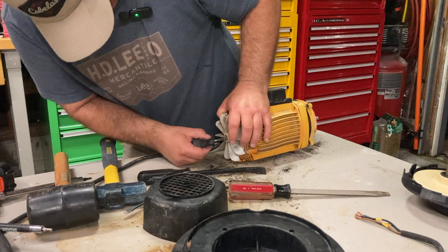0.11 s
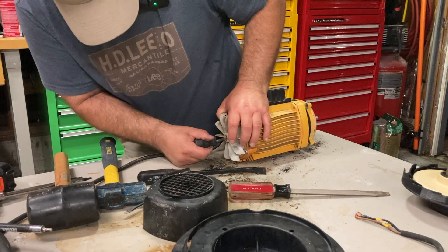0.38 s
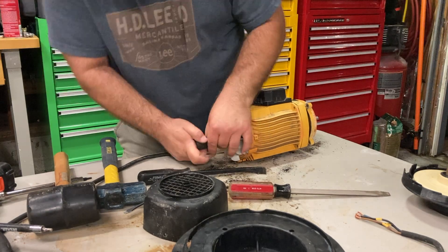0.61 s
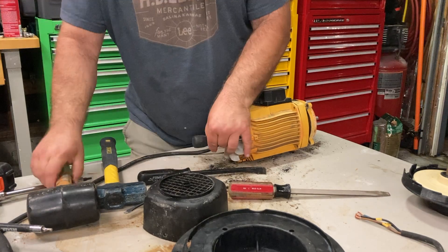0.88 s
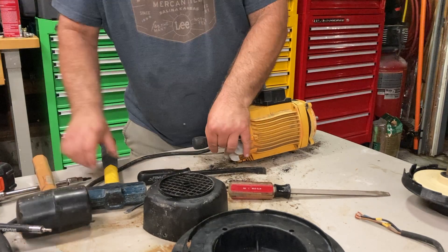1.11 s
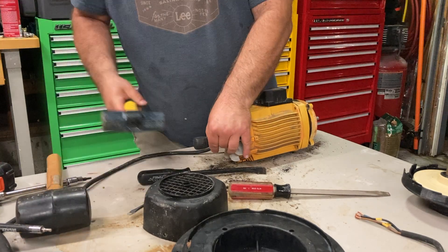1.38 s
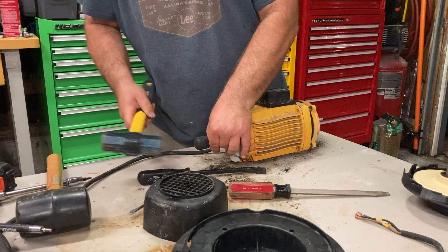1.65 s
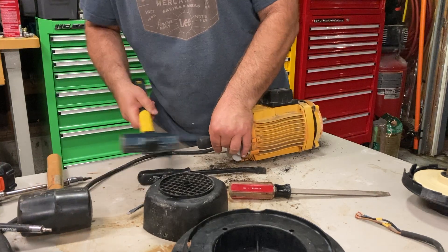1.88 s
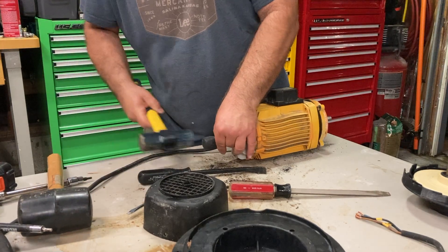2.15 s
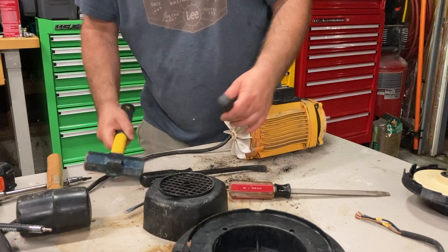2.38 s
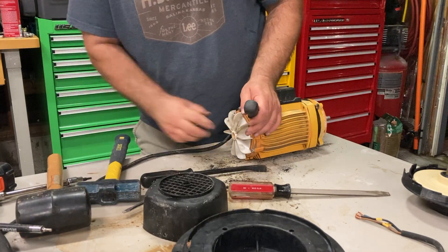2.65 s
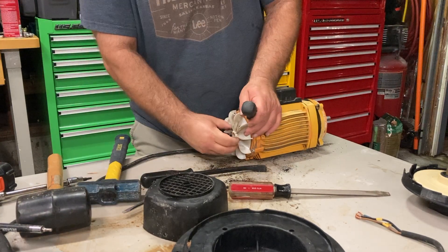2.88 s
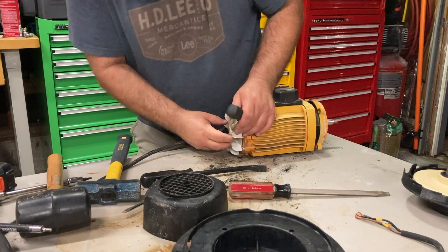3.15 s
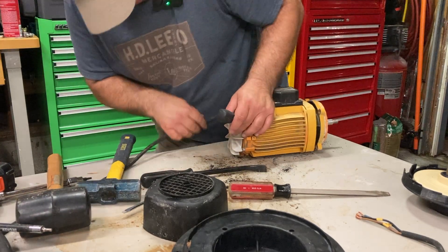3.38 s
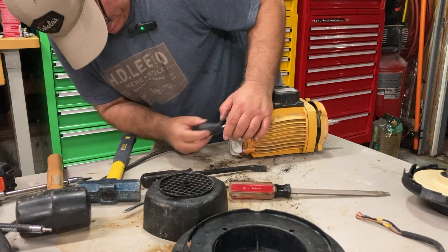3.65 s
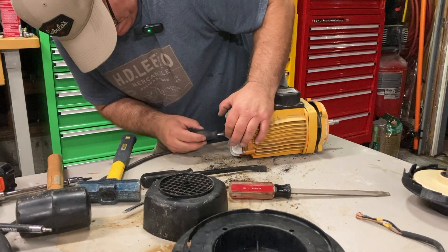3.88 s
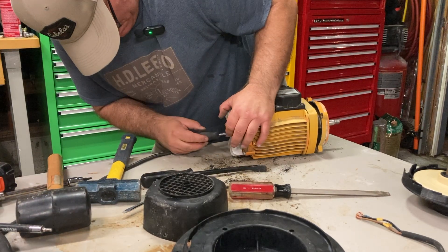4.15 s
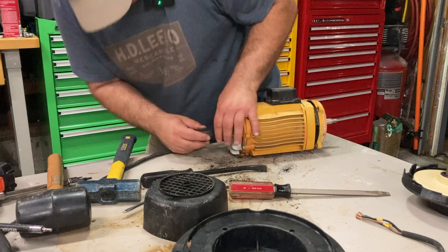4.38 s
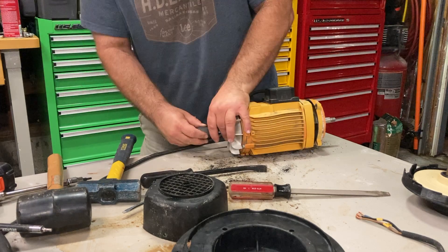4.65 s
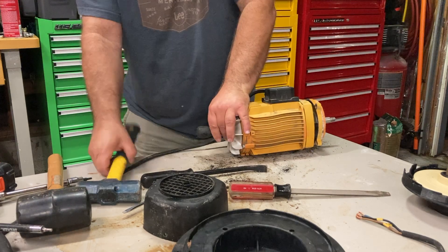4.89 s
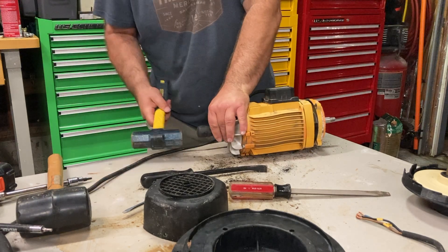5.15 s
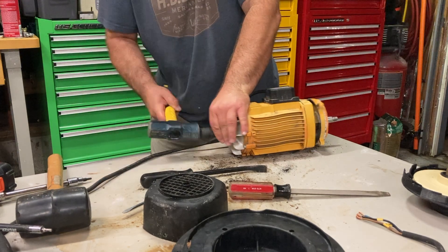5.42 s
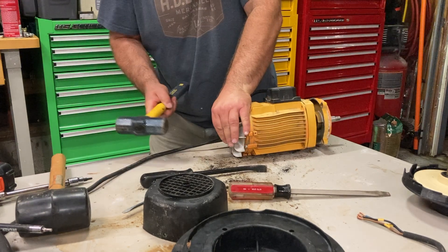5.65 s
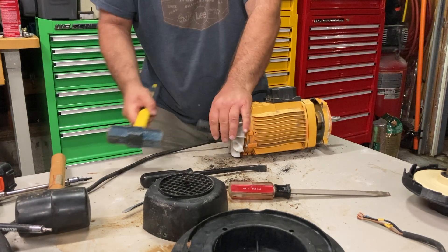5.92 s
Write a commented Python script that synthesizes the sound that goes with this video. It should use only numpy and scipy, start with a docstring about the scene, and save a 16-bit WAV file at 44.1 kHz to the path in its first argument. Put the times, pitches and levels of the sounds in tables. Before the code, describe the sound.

Five brisk hammer blows, tools knocked down and dragged on a workbench, fabric rumble against a lapel microphone, then three more hard, clacking blows.

```python
"""In a garage, a hammer taps a screwdriver against a plastic fan on a motor shaft, in two quick clusters.
The blows are fixed resonances and dying coloured noise. Around them tools land on the bench and drag
along it, the blade ticks on the part, and rubs and low rumbles swell as bands of grainy noise. The shirt
rumbles over and bumps a lapel microphone, which overloads on the loudest blows; late on, a thin tone holds."""
import sys
import numpy as np
from scipy import signal
from scipy.fft import rfft, irfft, next_fast_len
from scipy.io import wavfile
from scipy.ndimage import map_coordinates

SR = 44100
rng = np.random.default_rng(int(sys.argv[2]) if len(sys.argv) > 2 else 0)


def dump_mix(stems):
    """Bounce the given channels to the path in sys.argv[1] as a 16-bit WAV at rate SR."""
    frames = np.atleast_2d(stems).T  # one column per channel
    limited = np.clip(frames, -1, 1)  # hard clip at full scale
    pcm = np.round(limited * 32767).astype(np.int16)
    wavfile.write(sys.argv[1], SR, pcm)


def volts_from_decibels(level):
    """Turn decibel levels (scalar or array-like) into linear amplitude factors."""
    exponent = np.asarray(level, float) / 20
    return 10 ** exponent


N = 265967


def unit(x):
    """Normalisation: scale to rms 1."""
    return x / np.sqrt(np.mean(x ** 2) + 1e-20)


def along(points, hz):
    """Interpolation on a logarithmic frequency axis, of points (frequency_hz, value)."""
    f, v = np.transpose(points)
    return np.interp(np.log(hz + 1), np.log(f + 1), v)


def shelf(hz, corner_hz, db):
    """Shelving response: gain moves smoothly by db from below the corner to above it."""
    return volts_from_decibels(db * hz ** 2 / (hz ** 2 + corner_hz ** 2))


def filtered(x, response):
    """Linear filtering: the spectrum of x times a response given as a function of frequency."""
    m = next_fast_len(len(x) + 4096)
    return irfft(rfft(x, m) * response(np.fft.rfftfreq(m, 1 / SR)), m)[:len(x)]


def resonant(peaks, hz):
    """Modal superposition: a sum of damped second-order resonances of alternating sign."""
    return sum((-1) ** k * volts_from_decibels(db) * 1j * hz * width / (centre ** 2 - hz * hz + 1j * hz * width)
               for k, (centre, width, db) in enumerate(peaks))


def modes(peaks, t, sustain):
    """Free vibration: a blow rings every mode at a random strength; narrow resonances last longer."""
    hz, width, db = np.transpose(peaks)[:, :, None]
    # where a blow lands shifts each resonance, by about 1.2 %
    hz = hz * (1 + .012 * rng.standard_normal(hz.shape))
    strength = volts_from_decibels(db + 1.7 * rng.standard_normal(hz.shape))
    rings = strength * np.exp(-np.pi * width * t / sustain) * np.sin(2 * np.pi * hz * t)
    return rings.sum(0) / np.sqrt(np.sum(volts_from_decibels(2 * db)))


def dying(gain, t60, size):
    """High modal density: coloured noise, each frequency decaying at its own rate; first 10 ms at rms 1."""
    hz, t, z = signal.stft(rng.standard_normal(size), SR, nperseg=128)
    decaying = signal.istft(z * volts_from_decibels(-60 * t / t60(hz)[:, None]), SR, nperseg=128)[1][:size]
    coloured = filtered(decaying, gain)
    return coloured / np.sqrt(np.mean(coloured[:SR // 100] ** 2))


def waver(db, rate):
    """Random amplitude modulation: a gain that wanders by about db, with rate new values a second."""
    return volts_from_decibels(db * map_coordinates(rng.standard_normal(N // 20), [np.arange(N) * rate / SR]))


def rough_noise(spectrum, grain_db, rate):
    """Modulated random noise: coloured, stuttering in level, rms 1."""
    noise = waver(grain_db, rate) * rng.standard_normal(N)
    return unit(filtered(noise, lambda hz: volts_from_decibels(along(spectrum, hz))))


def strokes(rows, rise, fall):
    """Exponential envelopes: one gain per level column; rise, hold and fall at set dB per second."""
    t = np.arange(N) / SR
    shape = lambda s, hold: -rise * np.maximum(s - t, 0) - fall * np.maximum(t - s - hold, 0)
    return sum(volts_from_decibels(np.array(dbs)[:, None] + shape(s, hold)) for s, hold, *dbs in rows)


def add(track, s, sound):
    """Linear superposition: mix a sound in at time s."""
    part = track[round(s * SR):][:len(sound)]
    part += sound[:len(part)]


# spectrum of the quiet garage: frequency_hz, relative_level_db
AIR = [(12, -33), (20, 1.5), (65, -2), (204, -13.5), (388, -12), (527, -13.5), (3440, -27), (12000, -32.5),
       (14400, -23), (16000, -38)]


def quiet_air():
    """Stationary background noise: a coloured random hiss and hum with a slight waver."""
    return volts_from_decibels(-71.5) * rough_noise(AIR, grain_db=3.0, rate=53)


# decay of the room: frequency_hz, t60_s
GARAGE = [(100, 0.13), (1000, 0.15), (10000, 0.19)]


def garage(x):
    """Reverberation by convolution: a diffuse tail, each frequency dying at its own speed."""
    tail = dying(lambda hz: 1, lambda hz: along(GARAGE, hz), SR // 2)
    late = np.pad(x, (400, 0))  # the tail starts 9 ms behind the direct sound
    return signal.fftconvolve(late, tail / np.linalg.norm(tail))[:N]


# thin steady tone near the end: start_s, level_db
WHINE = (5.75, -76)


def whine():
    """Pure tone: a single sine that fades in within 14 ms and holds to the end."""
    start, db = WHINE
    t = np.arange(N) / SR
    return volts_from_decibels(db) * np.sin(2 * np.pi * 8800 * t) * np.clip((t - start) / 0.014, 0, 1)


# shirt dragging over the microphone: hold_start_s, hold_s, rumble_level_db
SHIRT = [(0, 0.018, -76), (.46, 0.3, -57.5), (.9, 0.46, -53.5), (1.432, .025, -53.5), (1.51, .06, -67),
         (2.2, .06, -58), (2.75, .06, -65), (3.19, 0.0077, -38.5), (3.31, 0.18, -41.5),
         (3.74, 0.021, -66.5), (3.9, 0.024, -63.5), (4.105, 0.26, -36), (4.4, .15, -49), (4.6, .18, -56),
         (4.84, 0.2, -53), (5.06, 0.081, -51), (5.35, 0.12, -53), (5.47, .06, -30.5), (5.6, .055, -31),
         (5.72, 0.28, -47)]
# spectrum of the dragging cloth: frequency_hz, relative_level_db
CLOTH = [(12, -21.5), (20, -3.5), (125, 9), (275, -4.5), (326, -8), (555, -19), (809, -28), (1200, -39),
         (1560, -67), (2640, -120)]
# shirt bumps on the microphone: push_s, push_level_db, sign (+1 push, -1 pull), time_scale_s
BUMPS = [(0.546, -17, 1, 0.0014), (0.607, -18, -1, 0.0012), (0.686, -22, -1, 0.00066),
         (0.763, -23, 1, 0.0007), (0.787, -16, -1, 0.0011), (.964, -13, 1, 0.00063),
         (1.22, -28.5, 1, 0.0008), (1.455, -27.5, 1, 0.00112), (3.272, -24.5, 1, 0.0019),
         (3.496, -14.5, 1, 0.0018), (3.906, -42, 1, 0.0017), (4.483, -5.5, 1, 0.00115),
         (4.624, -8, -1, 0.0012), (4.798, -18, -1, 0.001), (5.116, -15.5, -1, 0.001),
         (5.135, -13.5, 1, 0.0011), (5.541, -10, 1, 0.00081)]


def shirt():
    """Near-field pressure on the capsule: a lumpy rumble, and single pushes with rebound and shudder."""
    drag = strokes(SHIRT, rise=980, fall=570)[0] * waver(1.5, rate=18)
    out = drag * rough_noise(CLOTH, grain_db=2.5, rate=99)
    t = np.arange(SR // 5) / SR
    for s, db, sign, width in BUMPS:
        u = (t - .02) / width  # the push is centred 20 ms into its window
        push = np.exp(-1.2 * (np.sqrt(u ** 2 + 0.14) - .2))
        dip_before = 0.06 * np.exp(-((u + 3.2) / 0.8) ** 2)
        rebound = 0.38 * np.exp(-((u - 2.5) / 3.3) ** 2)
        add(out, s - .02, np.sign(sign) * volts_from_decibels(db) * (push - dip_before - rebound))
        shudder = dying(lambda hz: hz / (hz ** 2 + 90 ** 2) * 1500 ** 2 / (hz ** 2 + 1500 ** 2),
                        lambda hz: 0.17 * (hz / 100 + 1) ** -.3, len(t))
        add(out, s, volts_from_decibels(db - 22.5) * shudder * (1 - np.exp(-t / 0.0048)))
    return out


# bands of swelling noise (rubs, low bench or motor rumble, a fading ring):
# strongest_s, level_db, fall_s, centre_hz, spread_octaves
SWELLS = [(0, -71, 0.074, 723, 0.014), (.32, -43.5, 0.0064, 1116, 0.18), (0.574, -49.5, 0.02, 2140, 0.93),
          (0.569, -64.5, .03, 13380, .2), (.52, -66, 0.011, 3800, 0.11), (0.652, -64, 0.012, 6630, 0.18),
          (0.647, -64.5, 0.038, 2040, 0.32), (.9, -58, 0.0064, 990, 0.23), (1.254, -57, .014, 4300, .08),
          (1.47, -55, .03, 450, .3), (1.46, -63, 0.01, 9080, .4), (1.72, -64, .025, 1100, .3),
          (2.76, -63, .06, 350, .4), (2.368, -63, 0.021, 1254, .1), (3.13, -42, .03, 12500, .5),
          (3.155, -34, .015, 12500, 0.65), (3.216, -57, 0.016, 7150, 0.31), (3.329, -60, 0.017, 1950, 0.18),
          (3.319, -52, 0.022, 9200, 1.2), (3.403, -33.5, 0.013, 1040, .48),
          (3.409, -44.5, 0.038, 7996, 1.2), (3.435, -33, 0.014, 3760, 0.7), (3.44, -43, 0.017, 10870, 0.68),
          (3.718, -42.5, 0.0064, 3100, .4), (4.301, -63, 0.067, 14200, 0.21), (4.43, -71.5, .04, 2660, .06),
          (4.484, -51.5, 0.028, 2460, 1.3), (4.666, -51, 0.013, 6000, 0.26), (4.725, -39, 0.035, 3800, 2.1),
          (4.797, -57, 0.041, 10310, 0.37), (4.822, -50, 0.014, 5700, .22), (4.798, -51.5, .07, 1330, 0.97),
          (4.95, -41, 0.021, 11460, 0.37), (4.72, -52, .06, 400, .4), (5.05, -52, .07, 450, .5),
          (5.121, -51.5, 0.0087, 8650, 0.85), (5.201, -46.5, 0.013, 3000, 1),
          (5.214, -53.5, 0.0078, 13910, 0.41), (5.42, -48, .03, 330, .4), (5.58, -48, .02, 1100, .6),
          (5.77, -51, .03, 400, .5), (5.92, -50, .07, 280, .4), (5.743, -56, 0.0061, 4530, 0.088),
          (5.891, -57, 0.019, 3870, 0.18), (5.889, -60, 0.017, 2603, 0.076)]


def noise_swells():
    """Band-limited random noise: rubs, low rumble and a fading ring swell and fade, grainy and crackling."""
    out, t = np.zeros(N), np.arange(-SR // 5, SR // 3) / SR
    rise_over_fall, grain_db, crackles_per_s, crackle_db = .85, 3, 300, 16.5
    for s, db, fall, centre, spread in SWELLS:
        grain = volts_from_decibels(grain_db * map_coordinates(rng.standard_normal(400), [(t - t[0]) * 250]))
        # crackles: single samples jump out at random
        grain = grain * volts_from_decibels(crackle_db * (rng.random(len(t)) < crackles_per_s / SR))
        band = lambda hz: np.exp(-.5 * (np.log2((hz + 1) / centre) / spread) ** 2)
        # patchy spectrum: a random level every third of an octave
        patches = lambda hz: volts_from_decibels(3 * np.interp(np.log2(hz + 1), np.arange(45) / 3, rng.standard_normal(45)))
        noise = unit(filtered(grain * rng.standard_normal(len(t)), lambda hz: band(hz) * patches(hz)))
        swell = np.exp(-.5 * (t / np.where(t < 0, rise_over_fall * fall, fall)) ** 2)
        early = max(0, round((-s - t[0]) * SR))  # samples that fall before the start
        add(out, max(0, s + t[0]), (volts_from_decibels(db) * swell * noise)[early:])
    return out


# blade tip against the part: start_s, relative_level_db, tilt_db_per_octave
TICKS = [(0.0672, -45, -0.5), (0.3117, -26, 2), (0.3613, -33, 2), (3.155, -18, -5), (3.693, -31.5, 6),
         (3.7157, -22, 10), (3.9417, -39.5, 17), (3.9585, -37.5, -1), (4.1674, -14, 3.5),
         (4.4564, -21.5, -6.5), (4.6288, -44, -1.5), (4.7294, -30.5, -5.5), (4.9482, -5, -8),
         (5.1265, -32.5, 1.5), (5.1611, -43.5, 5), (5.7326, -48, 0), (5.8652, -47, -3.5), (5.888, -47, 0.5)]
# resonances of the steel tip: frequency_hz, width_hz, level_db
TIP = [(1090, 330, -8.5), (2750, 260, -5.5), (3992, 100, -9), (5655, 120, -4), (6820, 31, -5.5),
       (10450, 150, -10.5), (10320, 86, -12.5), (12004, 120, -7)]


def blade_ticks():
    """Impact excitation of a small body: light contacts of the steel tip, short, thin and resonant."""
    out, t = np.zeros(N), np.arange(SR // 8) / SR
    for s, db, tilt_db in TICKS:
        tilt = lambda hz: volts_from_decibels(tilt_db * np.log2((hz + 1) / 4000))
        thin = lambda hz: hz ** 2 / (hz ** 2 + 900 ** 2)
        colour = lambda hz: tilt(hz) * thin(hz) * (0.11 + resonant(TIP, hz))
        tick = dying(colour, lambda hz: 0.064 * ((hz + 500) / 4000) ** -.15, len(t))
        add(out, s, volts_from_decibels(db - 13.0) * tick * (1 - np.exp(-t / 0.00023)))
    return out


# resonances of the bench top: frequency_hz, width_hz, level_db
BENCH = [(226, 40, -8), (306, 53, -4), (401, 70, -2), (432, 45, -8.5), (500, 55, -5), (605, 40, -2),
         (790, 60, -5.5), (1250, 55, -1), (1760, 60, -20)]
# broad response of the bench top: frequency_hz, relative_level_db
BENCH_BODY = [(35, -49), (60, -17.5), (400, -4.5), (678, -2.5), (767, -0.5), (1090, -2), (1230, 0.5),
              (1660, -9), (4000, -31.5), (5200, -65.5), (8800, -120)]


def bench_colour(hz):
    """Plate response: the broad colour of the bench top plus its separate resonances."""
    peaks = resonant(BENCH, hz) * 2000 ** 2 / (hz ** 2 + 2000 ** 2)
    return 0.67 * volts_from_decibels(along(BENCH_BODY, hz)) + 1.1 * peaks


def thud(t):
    """Low-frequency body motion: the whole bench rocks on its legs."""
    rock = dying(lambda hz: hz ** 2 * 130 / (hz ** 4 + 130 ** 4), lambda hz: .2 + 0 * hz, len(t))
    return rock * (1 - np.exp(-t / .006))


# decay of the bench before each contact's factor: frequency_hz, t60_s
BENCH_T60 = [(100, 0.17), (300, 0.12), (1000, 0.1), (3000, 0.12), (12000, 0.059)]
# gritty edge of a hard contact: frequency_hz, relative_level_db
GRIT = [(2000, -6.5), (4500, -9.5), (6200, -3), (8000, -10), (15000, -12), (17000, -34)]


def knock(t, decay, treble_db, weight_db=0, hard_db=0):
    """Contact mechanics: the bench answers a landing; weight drives its bass, hardness its top."""
    t60 = lambda hz: decay * along(BENCH_T60, hz)
    tone = lambda hz: shelf(hz, 450, -weight_db) * shelf(hz, 810, hard_db)
    wood = dying(lambda hz: bench_colour(hz) * tone(hz), t60, len(t))
    grit = dying(lambda hz: volts_from_decibels(along(GRIT, hz)), t60, len(t))
    planks = 0.53 * volts_from_decibels(np.minimum(weight_db, 0)) * modes(BENCH, t, 1.3 * decay)
    contact = 0.85 * dying(lambda hz: volts_from_decibels(along(BENCH_BODY, hz)) * tone(hz),
                           lambda hz: 0.052 + 0 * hz, len(t))
    return (wood + planks + contact + volts_from_decibels(treble_db + 7.5) * grit) * (1 - np.exp(-t / 0.0029))


# tools landing on the bench: start_s, relative_level_db, weight_db, hardness_db, wooden_handle_db
KNOCKS = [(0.929, -15, -7, -5, -9), (1.028, -11.5, 4, 7.5, -7), (1.051, -17, -3, -1, -11),
          (1.102, 5.5, 1, 10.5, -16.5), (1.192, -22, 14, 9.5, -7), (1.432, -46, 15, -25, -28),
          (2.405, 0.5, 5.5, -7, -22.5), (2.414, -2, -7, -6, -18.5), (2.462, -4, 4.5, -2.5, -22),
          (2.469, 1, -2, 0.5, -18), (2.597, 5, 7.5, 3.5, -10.5), (2.613, 5, -3.5, 5.5, -14.5),
          (2.631, -1.5, 3.5, -4.5, -20.5), (3.093, -4, 1.5, 7, -39), (4.896, -22.5, -24, 41, -23),
          (4.932, -17, -33, 11, -23), (4.947, -11, -11.5, 16.5, -45), (5.699, -26, -11.5, -9.5, -18)]
# resonances of a wooden mallet handle: frequency_hz, width_hz, level_db
HANDLE = [(290, 30, -2), (600, 60, 0)]


def landings():
    """Impact and modal response: tools strike the bench, rock it and ring their wooden handles."""
    out, t = np.zeros(N), np.arange(SR // 4) / SR
    for s, db, weight_db, hard_db, handle_db in KNOCKS:
        decay = 0.9 - 0.0016 * db  # light landings ring slightly longer
        edge_db = -32.5 + 0.59 * min(hard_db, 18)  # grittier for hard contacts
        rock_db = -31.5 + (0.42 - 1) * db + 0.68 * weight_db  # relative to the landing
        landing = volts_from_decibels(-7.5) * knock(t, decay, edge_db, weight_db, hard_db) + volts_from_decibels(rock_db) * thud(t)
        add(out, s, volts_from_decibels(db) * (landing + volts_from_decibels(handle_db + 3.5) * modes(HANDLE, t, 0.94)))
    return out


# tools dragged along the bench: hold_start_s, hold_s, wood_level_db, grit_level_db, wooden_handle_level_db
DRAGS = [(1.014, .03, -33, -47.5, -45), (1.034, 0.017, -22.5, -50, -15), (1.07, .03, -46, -62, -40),
         (1.2, .035, -46.5, -62.5, -60), (1.256, .025, -27.5, -44, -27), (2.485, .055, -22.5, -43, -27),
         (2.555, 0.036, -28, -50.5, -34.5), (3.145, .02, -30, -37.5, -50), (4.885, .045, -38.5, -43.5, -55)]
# steel head on gritty wood: frequency_hz, width_hz, level_db
RASP = [(6250, 460, 3), (9200, 900, -1)]


def drags():
    """Stick-slip friction: a dragged tool catches and lets go, driving bench, grit and handle."""
    wood, grit, handle = strokes(DRAGS, rise=1400, fall=950)
    slips_per_s, slip_db = 180, 18.5
    slips = rng.standard_normal(N) * volts_from_decibels(slip_db * (rng.random(N) < slips_per_s / SR))
    hum = unit(filtered(slips, lambda hz: resonant(HANDLE, hz) ** 2))
    stutter = unit(filtered(slips, bench_colour))
    rasp = unit(filtered(rough_noise(GRIT, grain_db=2, rate=150), lambda hz: 1 + resonant(RASP, hz)))
    return handle * hum + wood * stutter + grit * rasp


# hammer blows: start_s, relative_level_db, bench_knock_db, handle_clack_db, fan_body_db
BLOWS = [(1.5988, -14.5, -7, -40.5, 1), (1.742, 1, -16, -11, 5.5), (1.8763, 4, -30.5, -9.5, 2),
         (2.0127, 4.5, -27, -2, 1), (2.1472, 4.5, -33.5, -4, -2), (5.3218, -3, -20.5, -4.5, 2),
         (5.4637, 4.5, -14, -9, 2.5), (5.5972, 3, -11, -31, 13)]
# handle, blade and fan under the hammer: frequency_hz, width_hz, level_db
STRUCK = [(892, 64, 0), (1106, 22, -1), (1820, 58, -2), (2177, 74, 5.5), (2483, 630, -5), (2320, 44, -13.5),
          (3493, 26, -11), (3950, 79, -6), (6400, 810, -12.5)]
# their broad response: frequency_hz, relative_level_db
STRUCK_BODY = [(180, -28.5), (300, -5), (870, -2.5), (1390, -2), (2030, 4), (3520, -12.5), (4370, -14.5),
               (6200, -10), (7820, -12.5), (12700, -13.5), (16000, -27)]
# their decay before the ring factor: frequency_hz, t60_s
STRUCK_T60 = [(300, .18), (900, .15), (1500, .11), (2300, .15), (3500, .165), (5000, .12), (6400, .142),
              (7500, .125), (11000, .125), (15000, .1)]
# the blade singing on after the last blow: pitch_hz, level_db, t60_s
BLADE = [(3020, -38, .3), (3994, -30, .16)]


def hammer():
    """Impulsive excitation: a blow cracks, rings handle, blade and fan, jolts the bench via the motor."""
    out, t = np.zeros(N), np.arange(SR // 3) / SR
    for s, db, knock_db, clack_db, body_db in BLOWS:
        treble_db = 2 - .45 * body_db  # more fan body, less treble
        fan = lambda hz: volts_from_decibels(body_db * np.exp(-(np.log2((hz + 1) / 1600) / .7) ** 2))
        struck = lambda hz: (.5 * volts_from_decibels(along(STRUCK_BODY, hz)) + 0.91 * resonant(STRUCK, hz)
                             + volts_from_decibels(clack_db) * np.abs(resonant([(3462, 360, 0.1)], hz)))
        colour = lambda hz: shelf(hz, 5000, treble_db) * fan(hz) * struck(hz)
        ring = dying(colour, lambda hz: .87 * along(STRUCK_T60, hz), len(t))
        # the handle's own short mode speaks first
        clack = volts_from_decibels(clack_db + 24.5 - 60 * t / 0.0088) * np.sin(2 * np.pi * 3500 * t)
        crack = 1.4 * dying(lambda hz: hz ** 2 / (hz ** 2 + 4000 ** 2) * shelf(hz, 12000, -16.5),
                            lambda hz: 0.011 + 0 * hz, len(t))
        late_fall = np.exp(-(t / 0.1423) ** 3)  # the late ring falls away ever faster
        onset = np.clip(t / 0.0011, 0, 1) ** 3
        blow = onset * late_fall * (ring + 1.5 * modes(STRUCK, t, 0.47) + clack + crack)
        add(out, s, volts_from_decibels(db - 10.5) * blow)
        add(out, s, volts_from_decibels(db + knock_db - 2.0) * knock(t, 1.2, -32.5))
        # the bench rocks more when more of the blow reaches it
        add(out, s, volts_from_decibels(db - 20.5 + .4 * knock_db) * thud(t))
    sing = sum(volts_from_decibels(db - 60 * t / t60) * np.sin(2 * np.pi * hz * t) for hz, db, t60 in BLADE)
    break_off = np.exp(-(t / .12) ** 6)  # the singing breaks off after about 0.12 s
    add(out, BLOWS[-1][0] + .015, sing * np.clip(t / .03, 0, 1) * break_off)
    return out


def scene():
    """Superposition of fields: bench sounds in the room, noise swells, shirt at the capsule, tone, air."""
    bench = hammer() + landings() + drags() + blade_ticks()
    room = volts_from_decibels(-36.0) * garage(bench)
    return (bench + room + noise_swells() + whine() + shirt() + quiet_air())[None]


def top_cut(x):
    """Nothing passes above the cut-off."""
    return signal.sosfilt(signal.butter(12, 16410, fs=SR, output="sos"), x)


def record(dry):
    """Amplitude saturation: the input stage overloads near full scale and drops the extreme treble."""
    clipped = dry / (1 + np.abs(dry / 1.02) ** 12) ** (1 / 12)
    dulled = filtered(clipped[0], lambda hz: 1 / (1 + (hz / 16000) ** 24))[None]
    return top_cut(dulled)


dry = scene()
out = record(dry)
dump_mix(out)
```